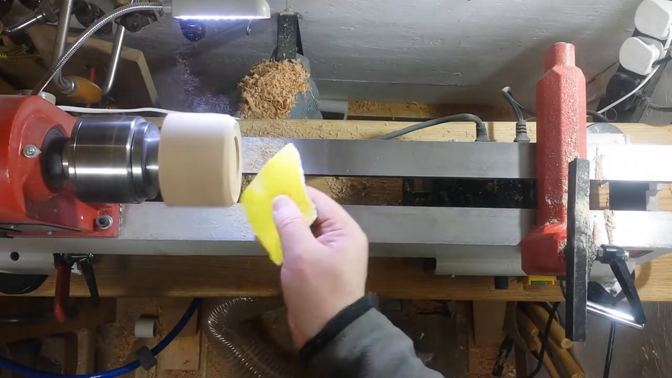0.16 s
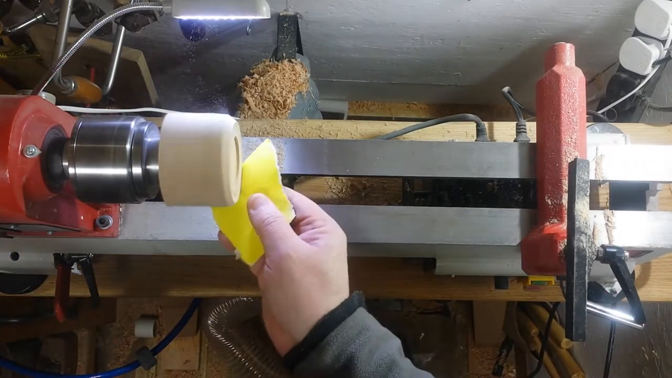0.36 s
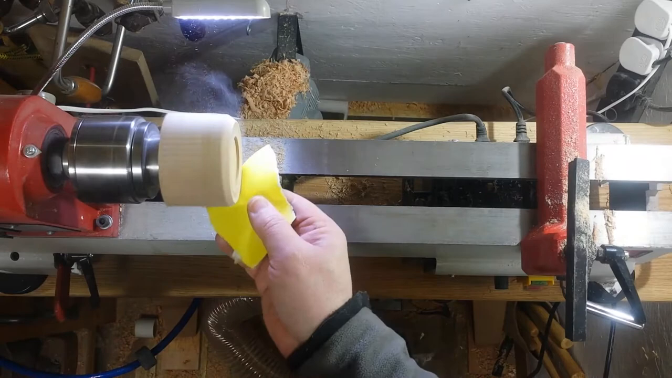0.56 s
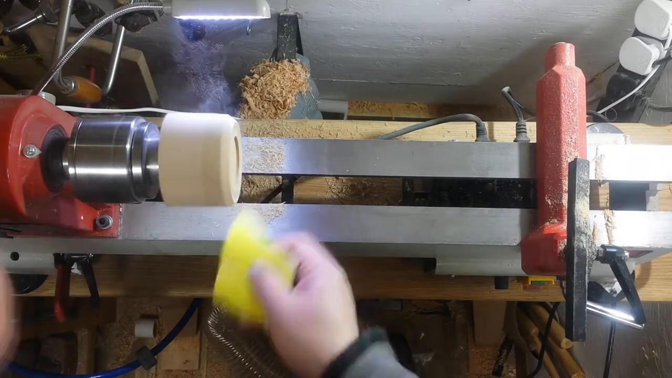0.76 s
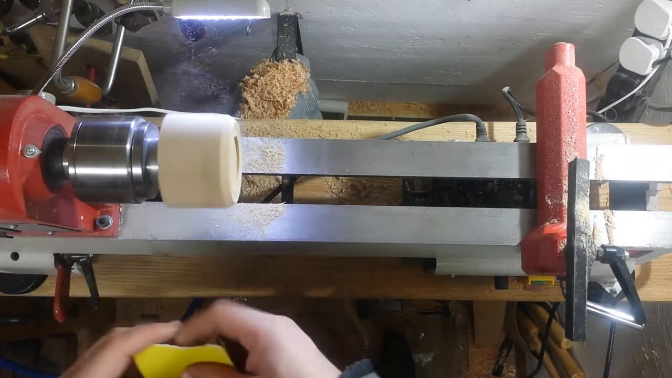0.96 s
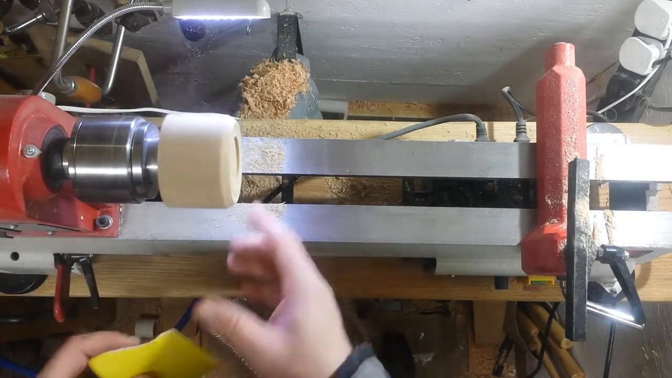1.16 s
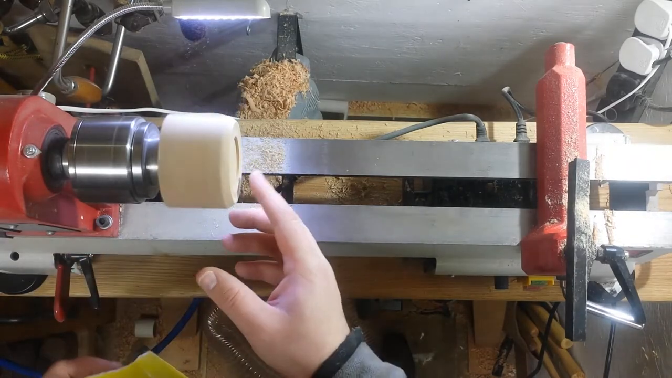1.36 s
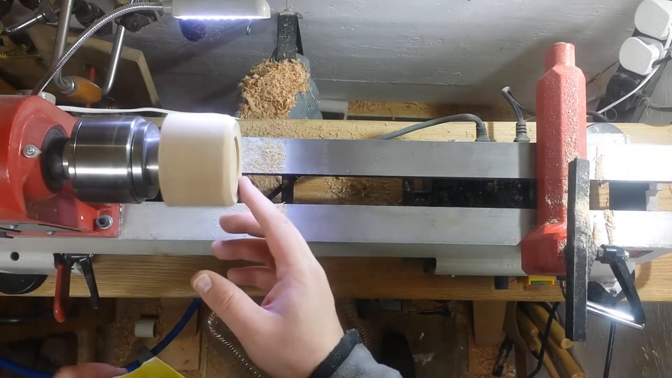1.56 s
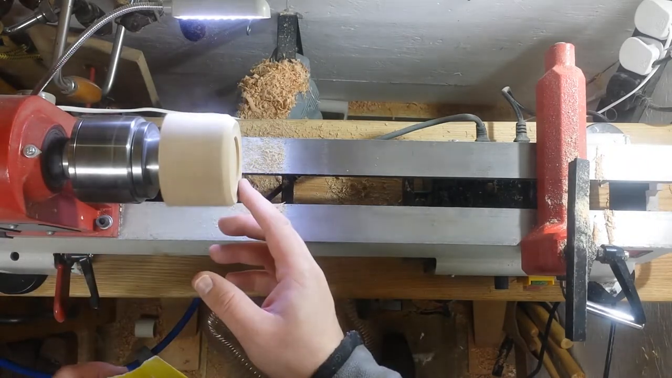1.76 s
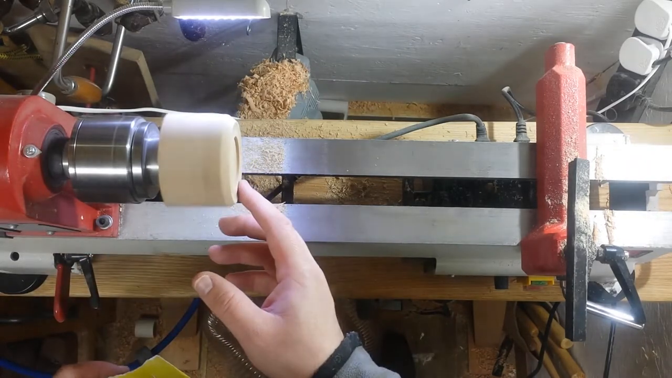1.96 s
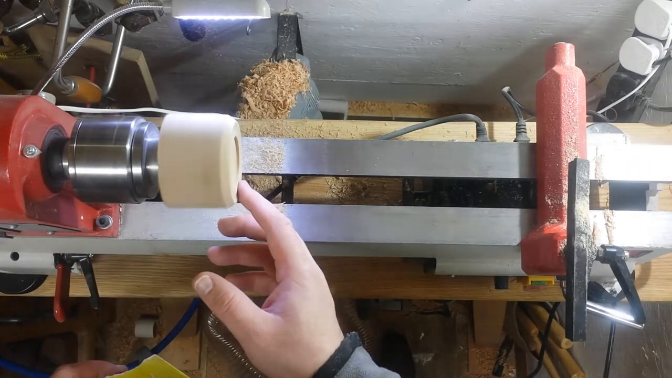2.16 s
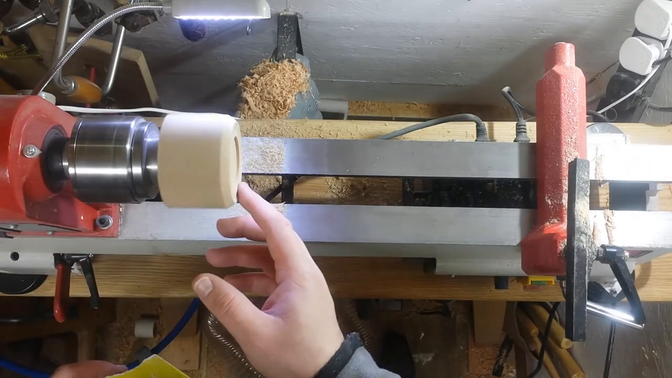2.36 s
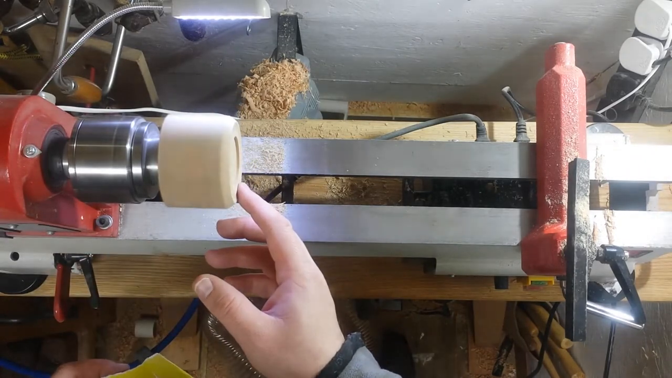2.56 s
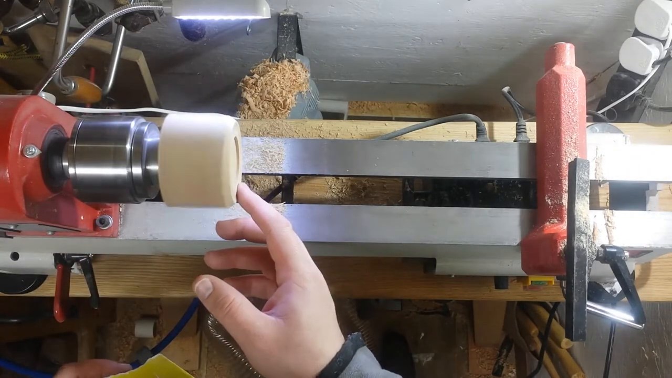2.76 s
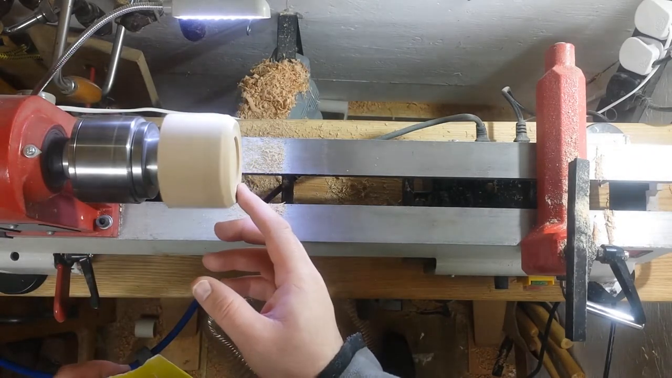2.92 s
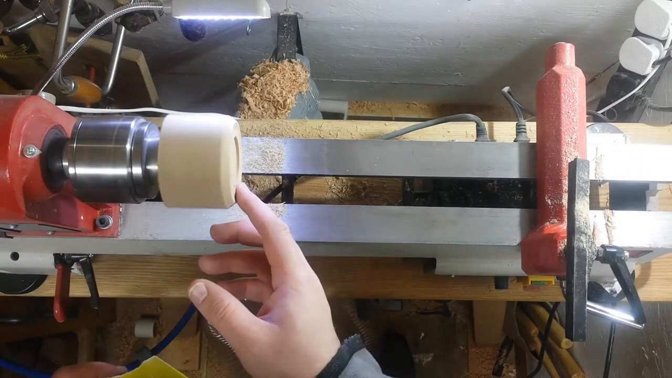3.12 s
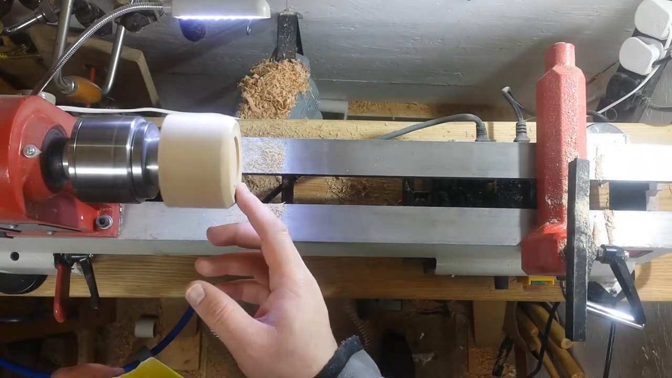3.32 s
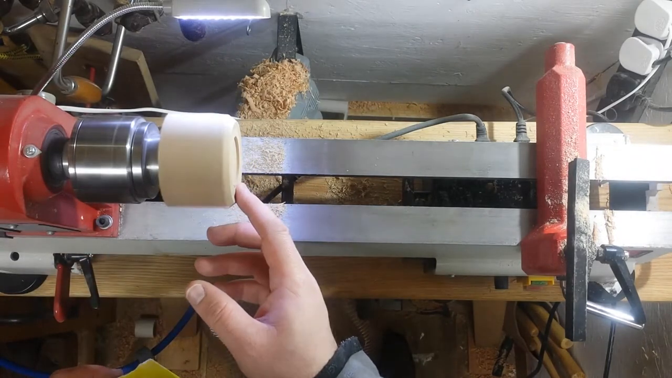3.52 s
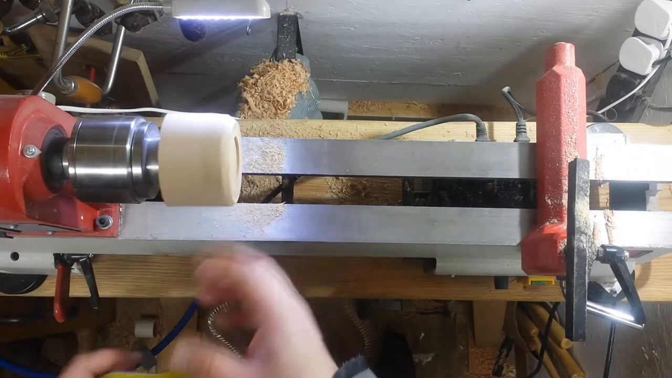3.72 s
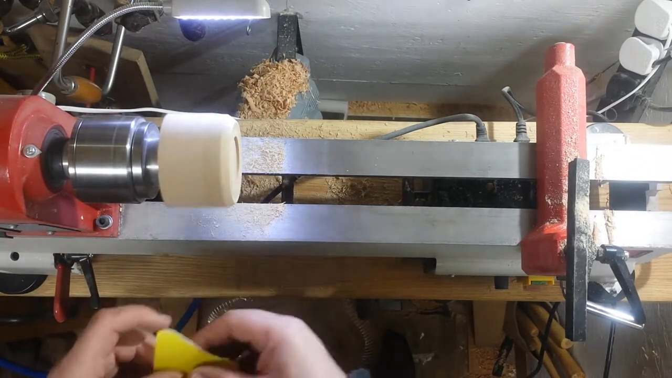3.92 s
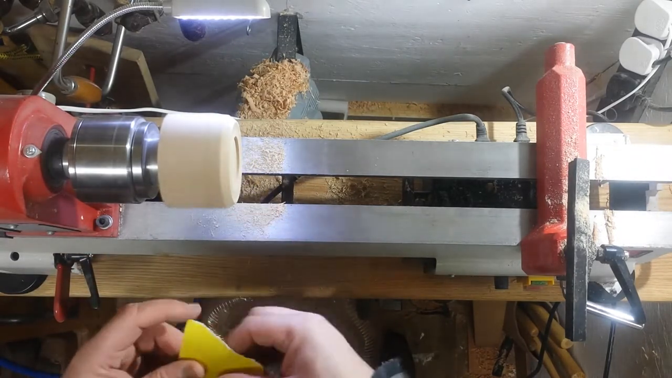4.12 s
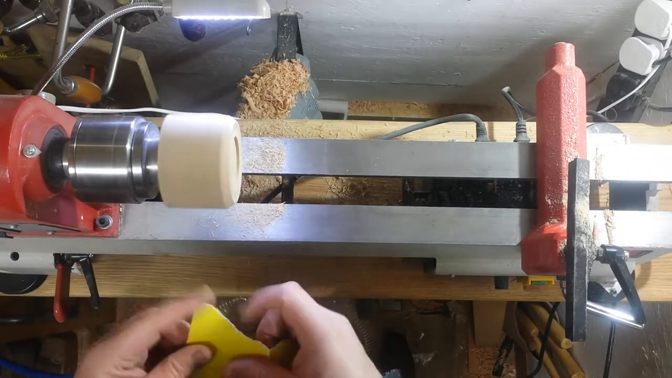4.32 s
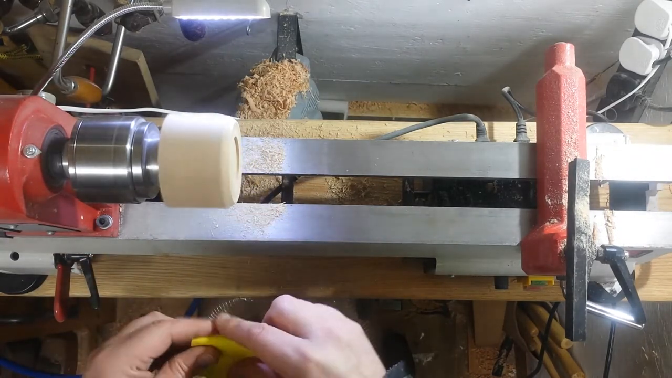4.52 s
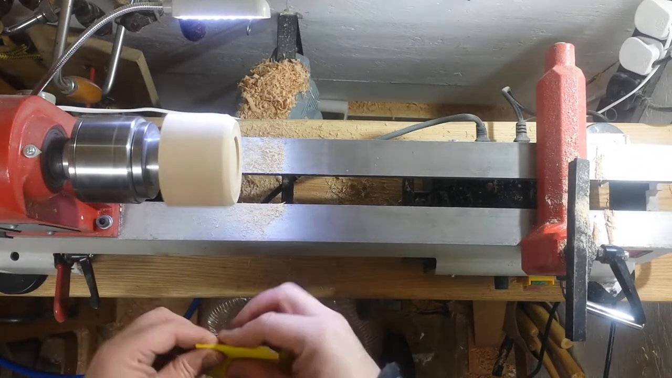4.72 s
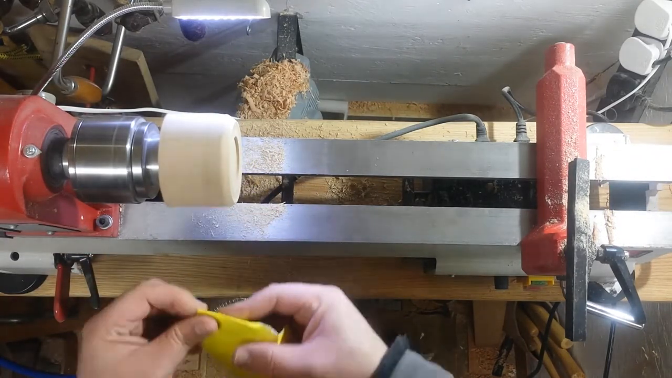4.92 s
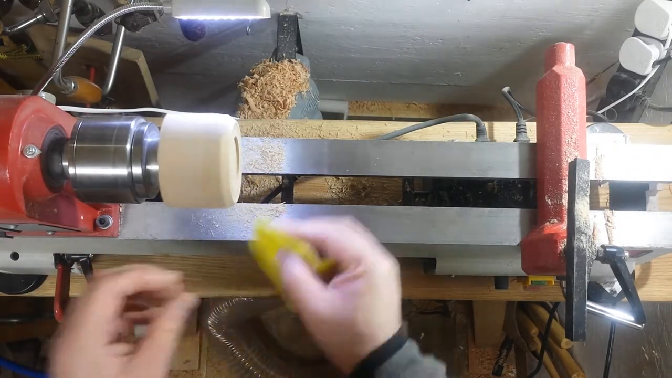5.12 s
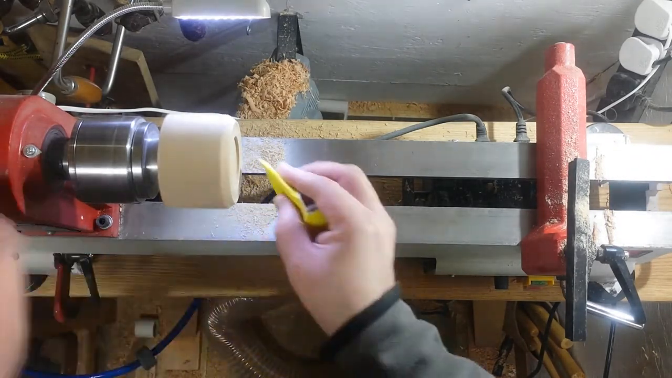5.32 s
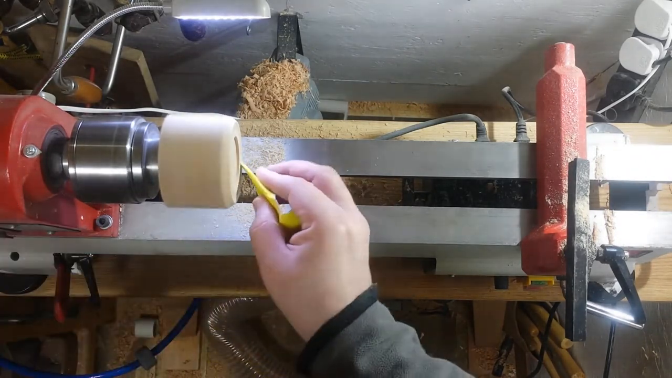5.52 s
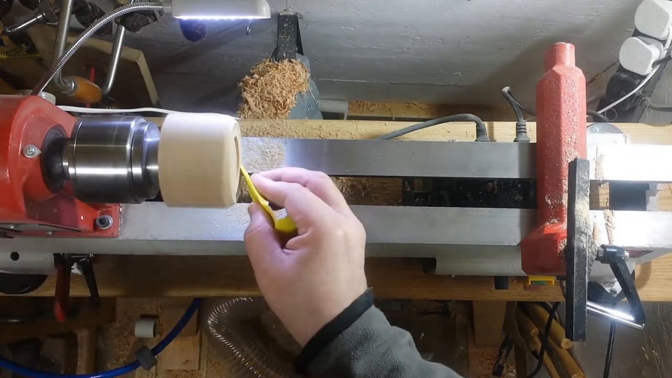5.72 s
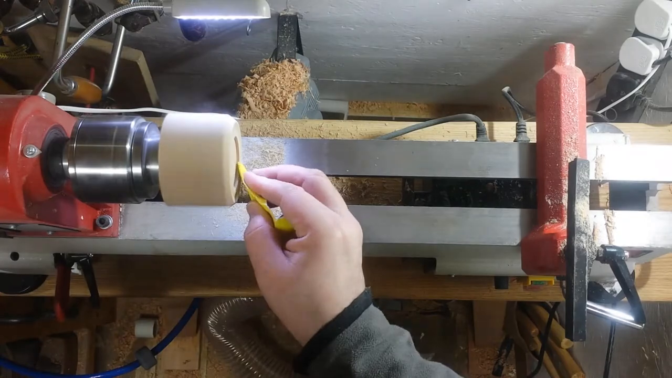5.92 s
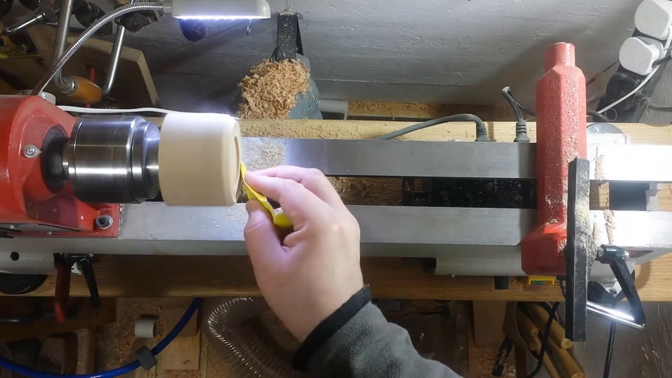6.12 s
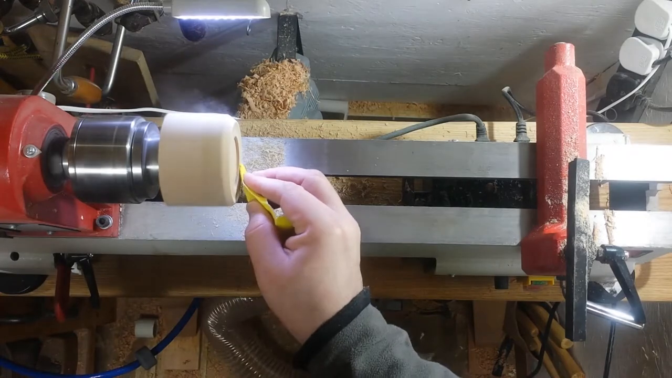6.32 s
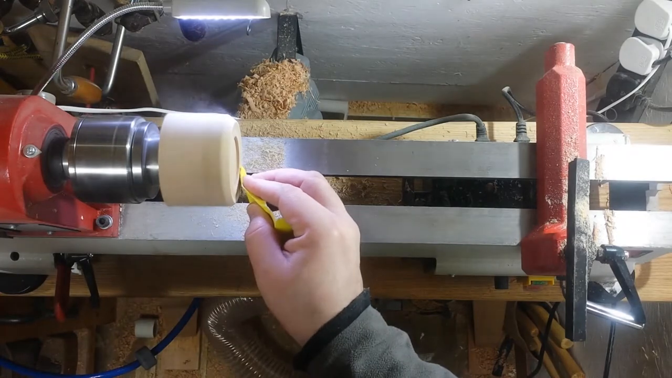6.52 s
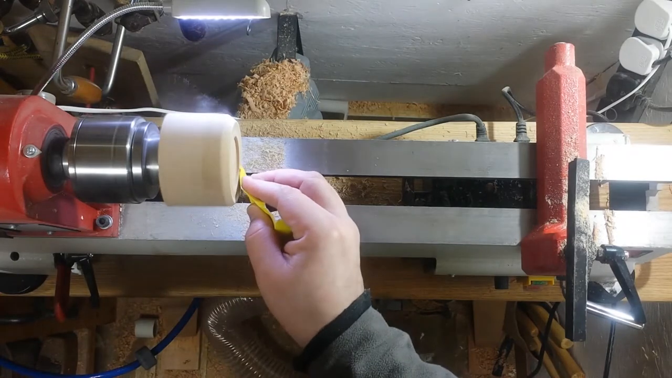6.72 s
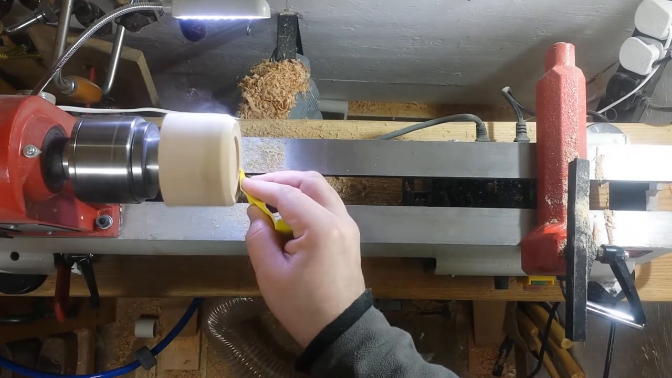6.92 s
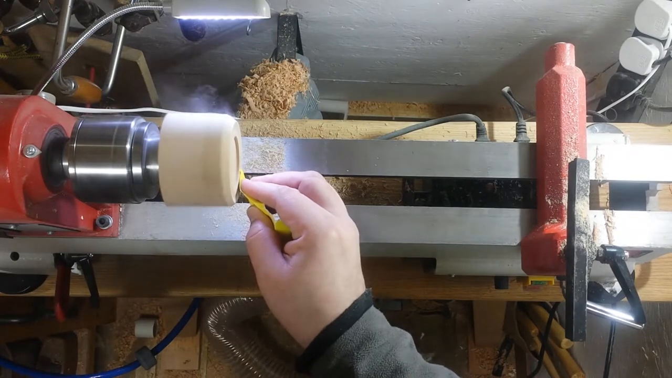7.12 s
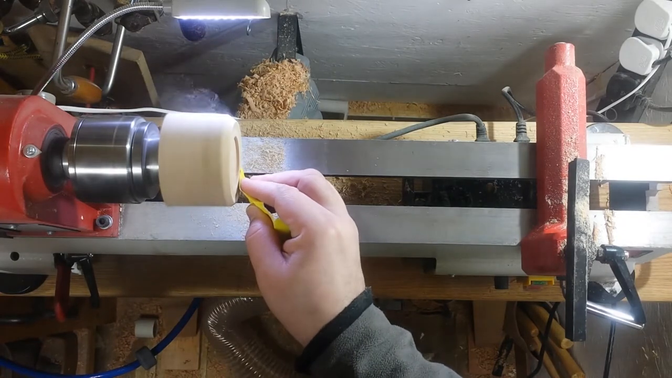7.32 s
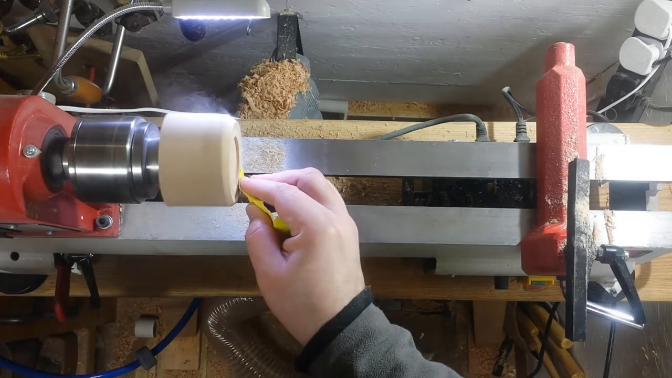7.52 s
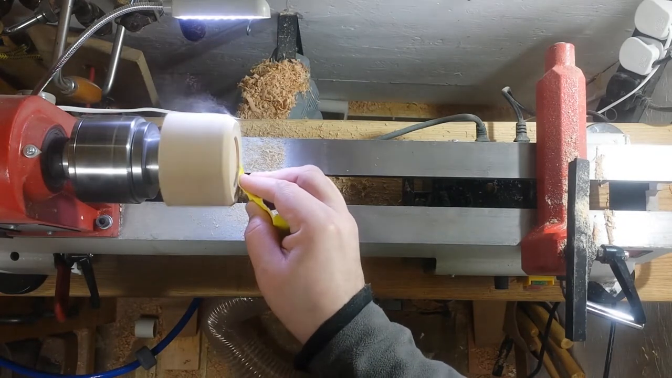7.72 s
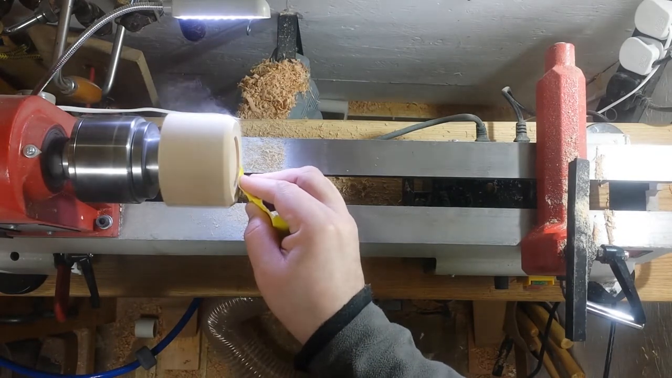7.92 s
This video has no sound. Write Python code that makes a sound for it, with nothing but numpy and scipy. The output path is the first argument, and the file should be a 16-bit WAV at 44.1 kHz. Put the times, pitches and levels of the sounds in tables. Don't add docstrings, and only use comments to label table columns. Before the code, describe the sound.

A wood lathe hums steadily with a thin high whine while sandpaper rasps in pulses, pauses for paper crackles, then rasps loudly again.

```python
import sys
import numpy as np
from scipy import signal
from scipy.fft import rfft, irfft, next_fast_len
from scipy.io import wavfile
from scipy.ndimage import uniform_filter1d

SR = 44100
rng = np.random.default_rng(int(sys.argv[2]) if len(sys.argv) > 2 else 0)


def digitize_waveform(pressure):
    field = np.atleast_2d(pressure).T
    bounded = np.clip(field, -1, 1)
    quanta = np.round(bounded * 32767).astype(np.int16)
    wavfile.write(sys.argv[1], SR, quanta)


def boost_factor(decibels):
    exponent = np.asarray(decibels, float) / 20
    return 10 ** exponent


N = 351477
PADDED = next_fast_len(N + SR // 2)

# f/Hz, density/dB per Hz
HUM_SPECTRUM = [(20, -54), (36, -11), (70, -28), (130, -14), (300, -11), (700, -11.5), (1240, -7),
                (1700, -1.5), (3100, -11.5), (3600, -21), (4100, -13.5), (5880, -7.5), (9000, -21),
                (12800, -26.5), (16000, -45)]
# f/Hz, width/Hz, level/dB
CASTING_MODES = [(42.1, 4.3, -8), (100, 25, -20), (156.5, 23, -9), (196, 43.6, -5.5), (282, 33, -9.5),
                 (389, 19.3, -8), (465.5, 31.5, -4.5), (543, 12, -7.5), (591, 27, -14), (594.4, 26, -11),
                 (679, 27.2, 0), (715.7, 14.3, -1), (775, 33, -6.5), (833, 13.5, -7.5), (911, 50, -12.5),
                 (952, 19, -13), (1047, 19, -7.5), (1106.7, 22.6, -1.5), (1210, 39, -27), (1342, 25, -20),
                 (1420, 28, -13.5), (1513, 21, -7.5), (1572, 5.7, -2.5), (1680, 13, -21), (1950, 13, -17),
                 (2159, 14, -4.5), (2390, 19, -6.5), (2940, 63, -14)]
# t/s, level/dB
WHINE_SHADE = [(0, -1), (.35, 3.5), (.45, 5), (.8, 0.5), (1.2, -1.5), (1.6, -4), (2.5, -3), (3.1, -2.5),
               (5.2, -2.5), (5.45, -5.5), (5.65, -3), (5.8, -7), (6.2, 9)]
# t/s, level/dB
AUTO_GAIN = [(0, -11.5), (.06, -6.5), (.35, -6), (.45, -8), (.72, -7.5), (.85, -6), (1.3, -7), (1.5, -6),
             (1.9, -1.5), (2.2, 0), (4.7, 0), (5.45, -0.5), (5.7, -2.5), (5.9, -10), (6.1, -14.5),
             (7.6, -12.5), (7.97, -8)]
# t/s, rasp level/dB, ring of the paper f/Hz
STROKES = [
    [(0, -18.5, 6060), (.05, -29.5, 5830), (.065, -48, 6200)],
    [(.354, -70, 6300), (.363, -25.5, 6150), (.385, -19, 6200), (.48, -21, 6930), (.56, -19.5, 6800),
     (.685, -21.5, 6400), (.705, -46, 6500), (.72, -45, 6700), (.74, -69, 6800)],
    [(5.524, -43, 5070), (5.531, -23.5, 4950), (5.565, -17.5, 5360), (5.78, -18.5, 5340), (6.0, -20, 6280),
     (6.4, -22, 6520), (6.73, -20, 6670), (7.3, -21.5, 6400), (7.97, -19.5, 6470)],
]
# t/s, dull contact over rasp level/dB, bright edge over rasp level/dB, ring sharpness/1
GRIPS = [
    (0, -18.5, -23, 0.76),
    (.2, -9.5, -5, 1.03),
    (3, -19.5, -8, 1.15),
]
# t/s, rate/turns per s
TURN_RATES = [(0, 30.5), (.4, 31.23), (.7, 30.744), (5.55, 28.4), (5.75, 31.45), (5.95, 30.58),
              (6.95, 29.54)]
# f/Hz, density/dB per Hz
PAPER_RINGS = [(300, -103), (2300, -28.5), (3050, -18.5), (3900, -11), (4550, -10), (5200, -3), (6100, 0.5),
               (6500, 4.5), (7050, -3.5), (7700, -1), (8150, -7.5), (9400, -10), (10400, -15.5),
               (14000, -19.5)]
# f/Hz, density/dB per Hz
DULL_CONTACT = [(150, -90), (700, -28), (1200, -11.5), (1700, -10), (2000, -9.5), (2350, -3.5),
                (2750, -3.5), (3050, -16), (3500, -3.5), (4500, -15.5)]
# f/Hz, density/dB per Hz
END_FACE = [(150, -90), (800, -26), (1200, -24), (1400, -10), (1700, 3), (2000, -9), (2300, -9),
            (3500, -72)]
# f/Hz, density/dB per Hz
FINE_GRIT = [(2000, -90), (7000, 10), (9500, 7), (11500, -11), (13500, -14), (15300, 17), (16200, -31)]
# t/s, drone level/dB, shudder level/dB
BED_LOADS = [
    (0, -41.5, -47),
    (.2, -38.5, -34.5),
    (3, -39, -49.5),
]
# t/s, peak level/dB, ring f/Hz, T60/s
SNAPS = [
    (0.683, -8, 7000, 0.0047),
    (.969, -43, 4000, .008),
    (1.115, -26, 3190, 0.028),
    (4.674, -10, 5800, 0.012),
    (5.897, -13, 5830, 0.023),
    (6.289, -16, 6360, 0.028),
    (6.353, -22, 6290, .02),
    (6.583, -20, 6500, 0.025),
]
# t/s, peak level/dB, rise/s, length/s, centre f/Hz
RUSTLES = [(0.95, -37, .003, 0.018, 6260), (.967, -33, 0.0022, 0.0061, 4000),
           (1.006, -28, 0.0063, 0.012, 6200), (1.092, -35, .002, 0.015, 6300),
           (1.11, -34, 0.0022, 0.0056, 3100), (1.14, -38, .003, 0.011, 5950),
           (3.909, -35, .004, 0.026, 6200), (4.052, -38.5, .008, 0.02, 6900),
           (4.151, -38.5, .008, 0.061, 6500), (4.232, -38, .004, 0.016, 5000),
           (4.28, -37.5, .008, 0.062, 6650), (4.355, -38, .008, 0.031, 6060),
           (4.403, -41, .008, 0.02, 6030), (4.657, -32, .01, 0.019, 6000),
           (4.6702, -19.5, 0.0008, 0.005, 5260), (4.681, -43, 0.0069, 0.0079, 5500),
           (4.779, -40.5, .004, 0.068, 5750), (4.855, -21, 0.0063, 0.015, 6100),
           (5.062, -29.5, .005, 0.04, 5760)]
# t/s, peak level/dB, f/Hz
BUMPS = [
    (1.049, -62, 48.4),
    (3.899, -59, 102),
    (4.258, -58, 110),
    (4.999, -58, 107),
]
# t/s, level/dB
FINGER_LEVEL = [(1.55, -75), (1.63, -55), (2.04, -48.5), (2.58, -46.5), (2.88, -47.5), (3.12, -53.5),
                (3.63, -53), (3.68, -77)]
# f/Hz, density/dB per Hz
SKIN_SPECTRUM = [(2500, -26), (3300, -11), (3650, -15), (4100, -3.5), (7200, 3.5), (10000, -7.5),
                 (12500, -13.5), (15300, 1), (16500, -26)]

BELT_HZ, WHINE_HZ = 15.85, 13352.3
HUM_DB = -39
WHINE_DB, WHINE_FOLLOWS = -45.5, 1.23
WOBBLE_DB, WOBBLE_HZ = 1.12, 9.5
FLAT_DB_PER_KHZ = 5
DULL_FADE_DB_PER_S, EDGE_FADE_DB_PER_S = 276, 900
FIRST_TURN = -.17
STEADY_SHARE = 0.76
LOAD_LAG_S = 0.1
PORT_LAG_S = 8e-5
SHOP_T60_S = .1
CUTOFF_HZ = 16100


def rms_one(x):
    return x / np.sqrt(np.mean(x ** 2) + 1e-20)


def in_time(rows):
    s, *columns = np.transpose(rows)
    return [np.interp(np.arange(N) / SR, s, c) for c in columns]


def in_steps(rows):
    s, *columns = np.transpose(rows)
    row = np.maximum(np.searchsorted(s, np.arange(N) / SR, side="right") - 1, 0)
    return [c[row] for c in columns]


def at_hz(points, hz):
    f, level = np.transpose(points)
    return np.interp(np.log(hz), np.log(f), level)


def drift(rate):
    r = np.exp(-80 * np.pi * rate / SR)
    noise = rng.standard_normal(N // 40 + 2002)
    slow = signal.lfilter([1], [1, -2 * r, r * r], noise)[2000:]
    return np.interp(np.arange(N) / 40, np.arange(len(slow)), rms_one(slow))


def patches(shape, frames, bins):
    field = rng.standard_normal(shape)
    for _ in range(2):
        field = uniform_filter1d(field, size=bins, axis=0)
        field = uniform_filter1d(field, size=frames, axis=1)
    return rms_one(field)


def coloured(x, gain):
    hz = np.maximum(np.arange(PADDED // 2 + 1) * SR / PADDED, 1)
    return irfft(rfft(x, PADDED) * gain(hz), PADDED)[..., :N]


def grains(per_s, spread_db):
    sizes = boost_factor(spread_db * np.minimum(rng.exponential(1, N), 5)) * rng.choice([-1, 1], N)
    return rms_one(sizes * (rng.random(N) < per_s / SR))


def fading(db, db_per_s):
    ramp = db_per_s * np.arange(N) / SR
    return np.maximum.accumulate(db + ramp) - ramp


def ports(shared, own):
    late = coloured(shared, lambda hz: np.exp(-2j * np.pi * hz * PORT_LAG_S))
    return [late, shared] + own


def casting(hz):
    modes = sum(boost_factor(2 * db) / (1 + ((hz - at) / (width / 2)) ** 4) for at, width, db in CASTING_MODES)
    return np.sqrt(boost_factor(2 * (at_hz(HUM_SPECTRUM, hz) - 11.0)) + modes)


def hum(hum_db):
    lap = np.arange(N) * BELT_HZ / SR + 0.0026 * drift(1.42)
    phases = 2 * np.pi * rng.random(int(SR / BELT_HZ / 2))
    pattern = rms_one(irfft(np.exp(1j * phases)))
    repeated = np.interp(lap % 1 * len(pattern), np.arange(len(pattern)), pattern)
    repeated = coloured(repeated, lambda hz: 1 / (1 + (hz / 900) ** 4))
    throb = boost_factor(0.35 * np.cos(2 * np.pi * lap) + 0.5 * np.cos(4 * np.pi * lap))
    shared = 1.48 * repeated + throb * rng.standard_normal(N)
    own = coloured(rng.standard_normal((2, N)), lambda hz: 0.35 + 1.6 / (1 + 800 / hz))
    waver_db = .6 * drift(2.2)
    return boost_factor(hum_db + 3.5 + waver_db) * rms_one(coloured(ports(shared, own), casting))


def whine(gain_db):
    turn = 2 * np.pi * WHINE_HZ * np.arange(N) / SR
    left = boost_factor(2.5 + 5.1 * drift(3.0)) * np.sin(turn + 0.75)
    right = boost_factor(20.5 + 0.82 * drift(9.6)) * np.sin(turn)
    level_db = WHINE_DB + WHINE_FOLLOWS * gain_db + in_time(WHINE_SHADE)[0] - 5.0
    return boost_factor(level_db) * np.array([left, right])


def joined_strokes():
    rows = []
    for stroke in STROKES:
        first, last = np.array(stroke[0]), np.array(stroke[-1])
        rows += [first - [.01, 40, 0], *stroke, last + [.03, -40, 0]]
    return rows


def high_spot_swell():
    turns = FIRST_TURN + np.cumsum(in_steps(TURN_RATES)[0]) / SR
    angle = 2 * np.pi * turns + .25
    return 4.8 * (np.cos(angle) - .1 * np.sin(2 * angle))


def contact_colour(hz, ring_hz, sharp, dull_over_db, edge_over_db):
    ring = boost_factor(sharp * at_hz(PAPER_RINGS, hz * 6500 / ring_hz))
    colour = ring / np.sqrt(np.mean(ring ** 2, axis=0))
    colour = colour + rms_one(boost_factor(at_hz(DULL_CONTACT, hz))) * boost_factor(dull_over_db - 5.5)
    flat = np.clip((5900 - ring_hz) / 800, 0, 1)
    colour = colour + flat * rms_one(boost_factor(at_hz(END_FACE, hz))) * boost_factor(dull_over_db - 3.5)
    colour = colour + rms_one(boost_factor(at_hz(FINE_GRIT, hz))) * boost_factor(edge_over_db - 10.5)
    return colour * boost_factor(2.3 * patches(colour.shape, frames=45, bins=2))


def sanding():
    rasp_db, ring_hz = in_time(joined_strokes())
    rasp_db = rasp_db + WOBBLE_DB * drift(WOBBLE_HZ)
    dull_over, edge_over, sharp = in_steps(GRIPS)
    flatness_db = FLAT_DB_PER_KHZ * (6500 - ring_hz) / 1000
    dull_db = fading(rasp_db + dull_over + flatness_db + 2.0 * drift(12), DULL_FADE_DB_PER_S)
    edge_db = fading(rasp_db + edge_over + 2.0 * drift(1.3), EDGE_FADE_DB_PER_S)
    swell_db = high_spot_swell()
    pressure = rms_one(boost_factor(swell_db + 0.8 * drift(40) + 0.8 * drift(180)))
    dull_over_db = dull_db - STEADY_SHARE * swell_db - rasp_db
    edge_over_db = edge_db - STEADY_SHARE * swell_db - rasp_db

    tears = [grains(per_s=10000, spread_db=3.0) for _ in range(3)]
    grit = pressure * ports(tears[0], 0.92 * np.array(tears[1:]))
    hz, s, frames = signal.stft(grit, SR, nperseg=256, noverlap=192)
    hz = np.maximum(hz, 1)[:, None]
    at = np.minimum(s * SR, N - 1).astype(int)
    colour = contact_colour(hz, ring_hz[at], sharp[at], dull_over_db[at], edge_over_db[at])
    rasp = signal.istft(frames * colour, SR, nperseg=256, noverlap=192)[1][:, :N]
    balance = boost_factor(np.array([[.4], [-.4]]))
    pressing = np.clip((rasp_db + 59) / 20, 0, 1)
    return rasp * boost_factor(rasp_db + 1.63) * balance, pressing


def bed_load(pressing):
    keep = np.exp(-1 / (LOAD_LAG_S * SR))
    taken_up = signal.lfilter([1 - keep], [1, -keep], pressing, zi=[keep])[0]
    return pressing * taken_up ** 2


def load_drone(drone_db, shudder_db, load):
    def bed_mode(hz):
        return 1 / (1 + ((hz - 283) / 12) ** 2) + 0.29 / (1 + ((hz - 310) / 50) ** 4)

    drone = coloured(rng.standard_normal(N), bed_mode)
    shudder = coloured(rng.standard_normal(N), lambda hz: 1 / (1 + ((hz - 175) / 45) ** 4))
    both = load * (boost_factor(drone_db + 2.0) * rms_one(drone) + boost_factor(shudder_db - 1) * rms_one(shudder))
    return signal.sosfilt(signal.butter(4, 125, "high", fs=SR, output="sos"), both)


def snaps():
    out = np.zeros(N)
    t = np.arange(SR // 20) / SR
    for s, peak_db, hz, t60 in SNAPS:
        at = round(s * SR)
        ring = np.sin(2 * np.pi * hz * t) * boost_factor(-60 * t / t60)
        crack = np.diff(rng.standard_normal(len(t) + 1)) * boost_factor(-60 * t / 0.0021)
        out[at:at + len(t)] += boost_factor(peak_db) * (ring + 0.16 * crack)
    return out


def rustles():
    out, crackle = np.zeros(N), grains(per_s=17000, spread_db=-2.0)
    t = np.arange(SR // 8) / SR
    wide = signal.butter(2, [1800, 10000], "band", fs=SR, output="sos")
    for s, peak_db, rise, length, hz in RUSTLES:
        at = round(s * SR)
        shape = np.minimum(t / rise, 1) * np.exp(-(t / length) ** 3)
        burst = crackle[at:at + len(t)] * shape
        band = signal.butter(2, [hz * .7, min(hz * 1.19, 15000)], "band", fs=SR, output="sos")
        sound = signal.sosfilt(band, burst) + 0.18 * signal.sosfilt(wide, burst)
        out[at:at + len(t)] += boost_factor(peak_db + 9.5) * sound
    return out


def bumps():
    t, out = np.arange(N) / SR, np.zeros(N)
    for s, peak_db, hz in BUMPS:
        push = np.exp(-((t - s - .04) / .04) ** 2)
        out += boost_factor(peak_db + 4) * np.sin(2 * np.pi * hz * (t - s)) * push
    return out


def finger():
    rows = [(FINGER_LEVEL[0][0] - .1, -90), *FINGER_LEVEL, (FINGER_LEVEL[-1][0] + .03, -90)]

    def skin(hz):
        return boost_factor(at_hz(SKIN_SPECTRUM, hz)) * (1 + 0.85 / (1 + ((hz - 7250) / 200) ** 2))

    brush = grains(per_s=11000, spread_db=4.5) * boost_factor(1.2 * drift(40))
    return boost_factor(in_time(rows)[0] + 11.5) * rms_one(coloured(brush, skin))


def shop(x, tail_db):
    t = np.arange(SR // 2) / SR
    tail = rng.standard_normal((2, len(t))) * boost_factor(-60 * t / SHOP_T60_S) * (t > .003)
    tail = boost_factor(tail_db) * tail / np.linalg.norm(tail[0])
    return coloured(x, lambda hz: 1 + rfft(tail, PADDED)) / np.sqrt(1 + boost_factor(2 * tail_db))


def scene():
    gain_db, = in_time(AUTO_GAIN)
    drone_db, shudder_db = in_steps(BED_LOADS)
    lathe = hum(HUM_DB + gain_db) + whine(gain_db)
    rasp, pressing = sanding()
    lathe = lathe + load_drone(drone_db + gain_db, shudder_db + gain_db, bed_load(pressing))
    hand = snaps() + rustles() + finger()
    near = shop(rasp + ports(hand, np.zeros((2, N))), tail_db=-6.0)
    return near + lathe + bumps()


def top_cut(x):
    return signal.sosfilt(signal.butter(12, 16150, fs=SR, output="sos"), x)


def record(dry):
    rounded = 1.05 * np.tanh(dry / 1.05)
    low_pass = signal.cheby2(12, 70, CUTOFF_HZ, fs=SR, output="sos")
    return top_cut(signal.sosfilt(low_pass, rounded))


dry = scene()
out = record(dry)
digitize_waveform(out)
```